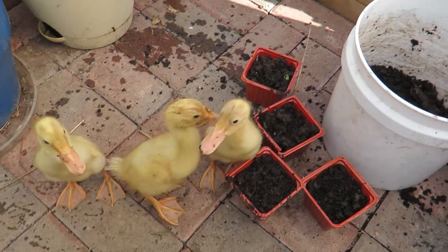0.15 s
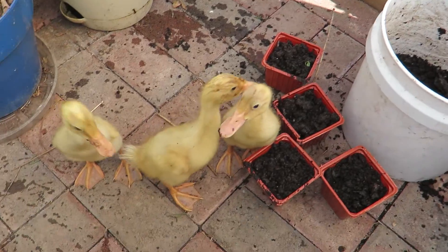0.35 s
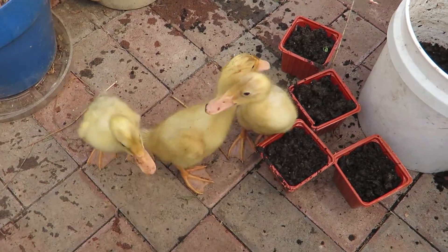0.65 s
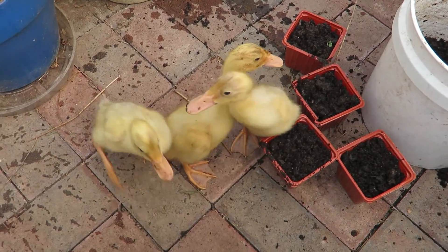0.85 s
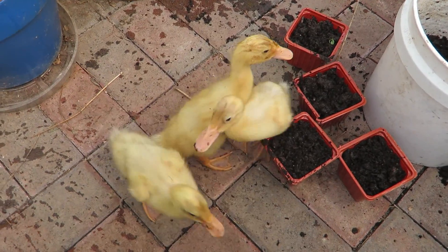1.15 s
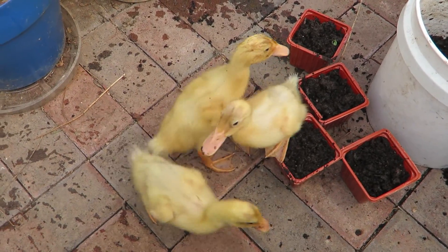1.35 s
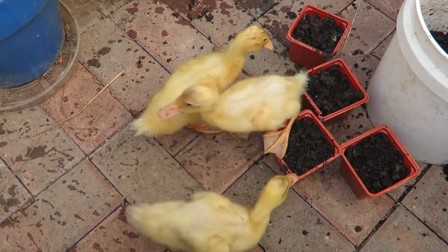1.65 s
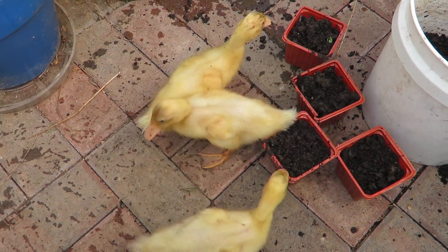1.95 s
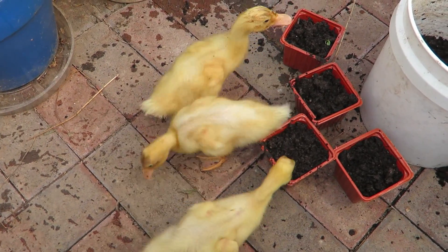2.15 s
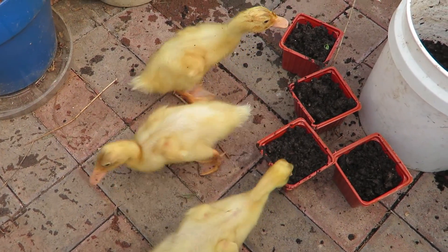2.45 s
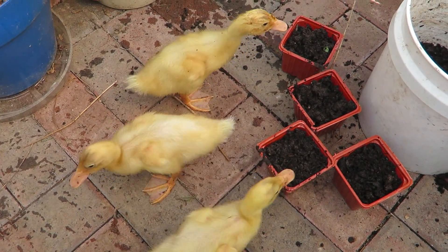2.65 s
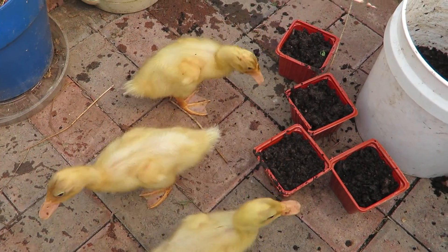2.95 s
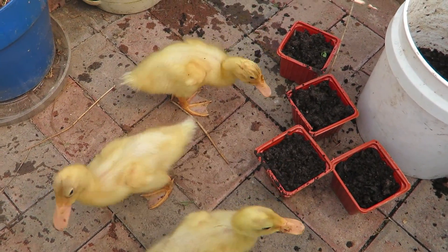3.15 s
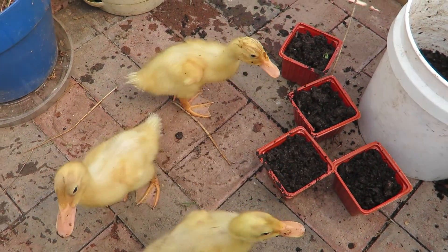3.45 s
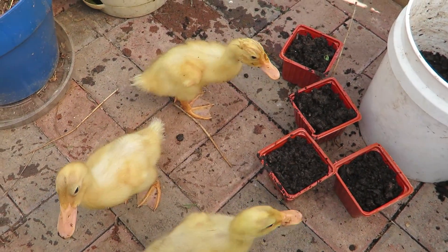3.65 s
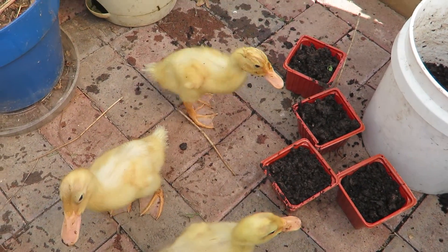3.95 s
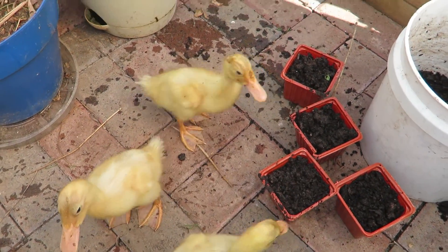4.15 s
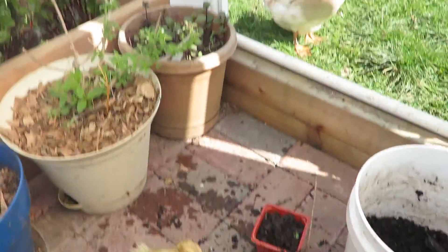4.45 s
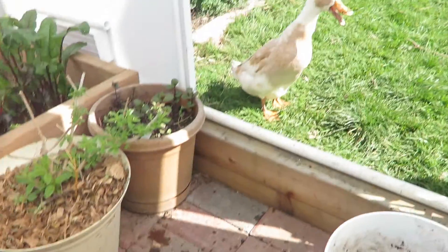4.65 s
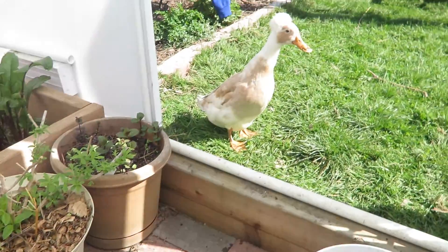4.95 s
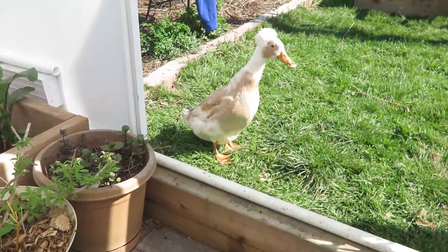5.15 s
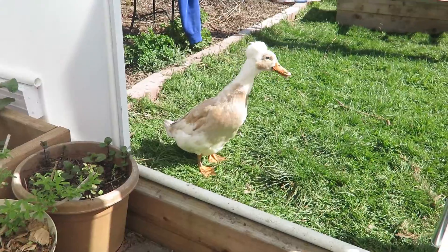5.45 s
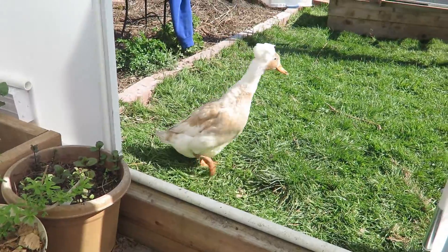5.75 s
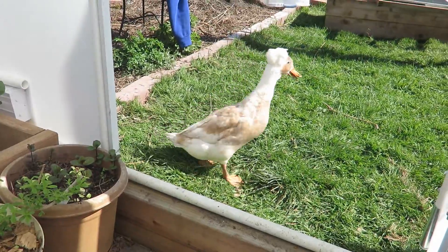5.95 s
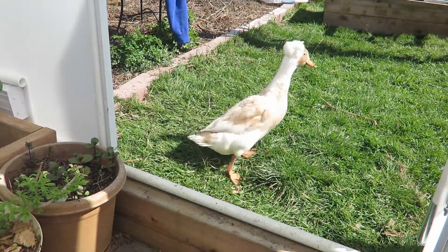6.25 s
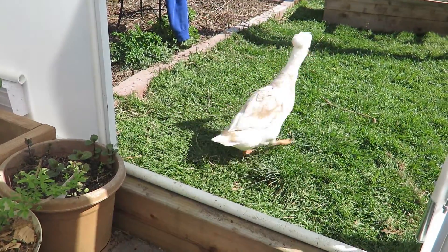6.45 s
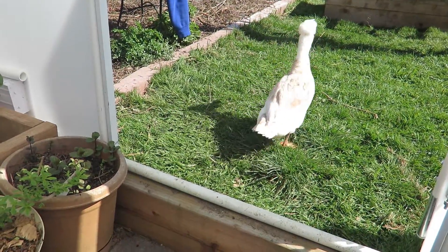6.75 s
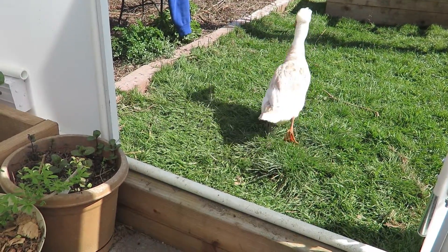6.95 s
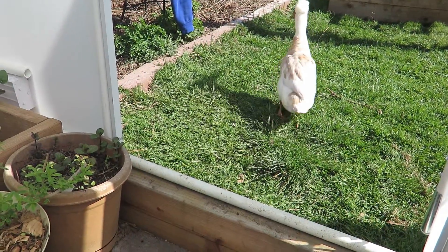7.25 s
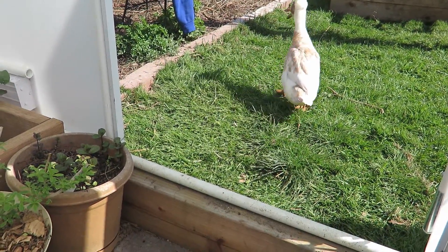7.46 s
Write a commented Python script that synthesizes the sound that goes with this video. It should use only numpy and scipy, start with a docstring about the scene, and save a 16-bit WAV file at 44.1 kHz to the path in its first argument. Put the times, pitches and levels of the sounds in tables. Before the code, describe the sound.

A nearby duck quacks loudly and steadily on a paved patio, with tiny duckling peeps, a plastic pot knock and a hoarse distant answer.

```python
"""A paved, walled patio: a near duck quacks roughly every three quarters of a second, a hoarse one answers from afar.
Both voices are harmonics of membrane pulses, shaped by throat, windpipe and bill and roughened by noise.
Ducklings peep in gliding whistles; feet and bills patter as short noise bursts among plastic pots.
A distant motor hums in wavering sines under coloured-noise hiss and rumble; echoes and a noise tail make the patio."""
import sys
import numpy as np
from scipy import signal
from scipy.fft import rfft, irfft, next_fast_len
from scipy.io import wavfile
from scipy.ndimage import uniform_filter1d

SR = 44100
rng = np.random.default_rng(int(sys.argv[2]) if len(sys.argv) > 2 else 0)


def digitize_waveform(pressure):
    """Quantize a signal to 16-bit integers and store it at the path in sys.argv[1].

    Rows of a 2-D input are taken as channels; values are limited to [-1, 1].
    """
    field = np.atleast_2d(pressure).T
    bounded = np.clip(field, -1, 1)
    quanta = np.round(bounded * 32767).astype(np.int16)
    wavfile.write(sys.argv[1], SR, quanta)


N = 335601

# spectrum of the outdoor hiss: freq_hz, density_db (per Hz, relative)
HISS_SPECTRUM = [(200, -3), (300, 2), (500, -1.5), (900, 1), (1500, -5), (2500, -8), (4000, -12),
                 (6300, -17.5), (8000, -23), (10000, -26), (12500, -30), (15000, -44.5)]
# width of hiss and rumble: freq_hz, side_minus_mid_db
AIR_WIDTH = [(60, -26.5), (100, -22.5), (170, -4), (280, 0.5), (460, -1.5), (770, -6.5), (1280, -8.5),
             (2140, -9.5), (3560, -9.5), (5940, -12)]
# spectrum of the low rumble: freq_hz, density_db (per Hz, relative)
RUMBLE_SPECTRUM = [(15, -41.5), (28, -21.5), (40, -8.5), (65, -10.5), (100, 5.5), (150, -5), (200, -12),
                   (300, -23), (600, -55.5)]
HISS_DB, RUMBLE_DB, RUMBLE_SWELL_DB = -61, -59, 1.5

# motor hum lines, each swelling and sinking: freq_hz, loudest_db, loudest_at_s, sink_db_per_s, most_sink_db
HUM_LINES = [(42, -54, 6.5, 2, 17), (78.3, -48.5, 4, 6, 11.5), (130, -60, 6.2, 6, 7.5),
             (158.3, -52, 7.0, 2.5, 15.5), (241, -67.5, 6.0, .5, 3)]

# reflections from paving, wall and pots: delay_s, level_db
REFLECTIONS = [(.0027, -18), (.0089, -9.5), (0.0148, -6), (0.0207, -20)]
# the patio tail in the middle; bass escapes to the sky, treble is soaked up: freq_hz, level_db
TAIL_MID = [(150, -13), (400, -4.5), (900, -4), (1500, -1), (3000, 3.5), (8000, -5), (14000, -9.5)]
# the patio tail at the sides: freq_hz, level_db
TAIL_SIDE = [(100, -11.5), (280, -15), (770, -25.5), (2100, -16.5), (6000, -8.5), (12000, -6)]
TAIL_T60_S = 0.19

# feet and bills against pots and paving: start_s, level_db, centre_hz, t60_s
TAP_EVENTS = [(1.019, -39.5, 1470, 0.258), (1.039, -51, 3525, 0.1), (1.155, -56, 5480, .03),
              (1.316, -19, 1060, 0.084), (1.324, -16.5, 2600, 0.0094), (1.324, -21, 1360, 0.2),
              (1.417, -32, 4230, 0.01), (1.431, -35, 4033, 0.013), (1.979, -60.5, 4840, .05),
              (2.255, -37, 900, 0.043), (2.31, -45.5, 1199, 0.041), (3.0, -53, 4510, 0.0277),
              (5.02, -50, 2975, 0.033)]

# peeps that flick up, slide to a held note that creeps up, then drop:
# start_s, flick_s, slide_s, hold_s, top_hz, held_hz, flick_db, held_db
HOOKED_PEEPS = [(1.511, 0.0506, 0.0327, 0.028, 4366, 2865, -54.5, -41.5),
                (4.404, 0.036, 0.0432, .035, 3910, 2320, -55.5, -38),
                (4.533, 0.011, 0.013, .028, 2280, 1987, -54, -43),
                (5.236, 0.048, 0.034, .04, 3720, 2330, -56, -41),
                (6.38, .024, .032, .036, 3950, 2650, -57, -38),
                (7.085, 0.024, 0.036, 0.041, 3750, 2594, -52.5, -38),
                (7.391, 0.025, 0.039, .05, 3615, 2660, -49, -35.5)]
HOOK_FROM_HZ, HOOK_TO_HZ, DROP_S = 1650, 1600, 0.017
CREEP_RATIO = 1.09  # pitch at the end of the hold over the held note
SLIDE_SAG = 0.35  # share of the slide's height left halfway down
MID_FLICK_DB = -1.5  # against the ends of the flick
MID_SLIDE_DB, HOLD_END_DB, DROP_DB = -1, -0.5, -15  # against the held note
# peeps that rise, hold and fall: start_s, length_s, from_hz, top_hz, to_hz, level_db
ARCHED_PEEPS = [(0.62, .088, 1860, 3756, 2896, -51), (2.146, .1, 1487, 3330, 2700, -54.5),
                (2.172, .033, 1710, 2306, 1547, -57), (4.165, 0.09, 2020, 2433, 1971, -48.5)]
# course of an arched peep: length_share, height_share (of the way to the top), level_db
ARCH_COURSE = [(0, 0, -6.5), (.13, .45, 3.5), (.3, .88, -2.5), (.5, 0.98, -0.5), (.7, .85, -3),
               (1, 0.21, -2.5)]
# second and third harmonic of a peep: level_db
PEEP_HARMONICS_DB = [-28.5, -45]

# far duck, one list a call: time_s, pitch_hz, effort_db
FAR_CALLS = [
    [(3.355, 172.5, -50.5), (3.375, 177, -34), (3.4, 177.3, -31), (3.44, 164, -66)],
    [(3.488, 158.7, -34), (3.52, 175.2, -28.5), (3.552, 181, -38.5), (3.58, 174, -61)],
    [(3.67, 150.3, -40.5), (3.69, 160.5, -26), (3.71, 168.5, -35.5), (3.722, 196, -22.5),
     (3.78, 204.2, -24.5), (3.84, 197.6, -22.5), (3.9, 187.2, -24)],
]
# bill brightness of each far call: start_db, end_db
FAR_BRIGHTNESS = [(-11, -23), (11.5, -14.5), (1, -4)]
# far duck's fixed resonances, windpipe then bill: centre_hz, width_hz, level_db
FAR_WINDPIPE_RESONANCES = [(290, 250, -34), (914.5, 100, -21), (1403, 80, -18), (2725, 230, -9.5)]
FAR_BILL_RESONANCES = [(3290, 460, -9.5), (4600, 610, -20.5)]
FAR_THROAT_WIDTH_HZ, FAR_CHEST_DB, FAR_ROUGH = 170, -29, 0.42
FAR_THROAT_HARMONIC = 10.1  # its throat resonance rides at this multiple of the pitch

# near duck, one row a quack: start_s, length_s, top_hz, glide_exponent, effort_db, bright_db, hoarse_factor,
# throat_hz (widest), then throat strength: burst_db, dip_share (of length), dip_db, late_db
NEAR_QUACKS = [(-.033, 0.22, 302, 1.0, -13.5, 0, 0.81, 1662, 2, 0.41, -2.5, -4.5),
               (0.692, .21, 290.8, 1.02, -14, -1.5, 0.94, 1700, 2.5, 0.79, -7, -1.5),
               (1.612, 0.21, 293.4, 1.02, -14.5, -1, 1.14, 1724, 3.5, 0.57, -0.5, 0.5),
               (2.39, 0.21, 298.2, 0.91, -14, 0, 0.88, 1720, 1.5, 0.62, -4, -3),
               (3.09, 0.21, 296.9, .93, -14, -0.5, 1.1, 1680, 2, .45, -3, -2.5),
               (3.869, 0.23, 289.1, 1.01, -14, 0, 0.74, 1704, 2, 0.64, -1, 0),
               (4.625, 0.22, 296.7, 1.02, -14.5, 2.5, 1.3, 1650, 2, 0.79, -0.5, -1),
               (5.352, .209, 291.8, .93, -13, 1.5, .6, 1514, 1, .45, 0, 2),
               (6.037, 0.22, 291.4, .92, -15, -.5, 0.966, 1580, 3.5, 0.34, -3.5, 0.5),
               (6.735, 0.22, 289.2, .85, -16.5, -2, 1.055, 1588, 4, 0.45, -1.5, 0.5),
               (7.445, 0.25, 290.4, 0.85, -13.5, -0.5, 1.03, 1534, -2.5, .3, 3.5, 2)]
# windpipe resonance under the second harmonic, one value a quack: low_db
NEAR_LOW_DB = [.5, -1.5, -2, 0, -.5, -3, -0.5, 1, 2, -2.5, 1]
# course of every quack: length_share, effort_db, opening (throat, 0-1), chest_db, bill_db, rough (0-1)
QUACK_COURSE = [(0, -14, 0.01, 2.5, -19.5, .13), (.04, -9.5, .15, -2.5, -8.5, .18),
                (.09, -3, 0.2, -7.5, -1.5, 0.3), (.17, 2, .55, 1, -1, .17), (.285, 0, .85, 0, 1, .05),
                (.49, -1, 0.6, -.5, 0, .06), (.66, .5, 1, -0.5, 1.5, 0.1), (.8, 0, 0.98, -4.5, 1, 0.11),
                (.91, -1.5, .75, 2.5, 0, 0.15), (1, -7, 0.3, 2, -0.5, .2)]
# pitch of every quack: length_share, top_pitch_share
PITCH_COURSE = [(0, .46), (.09, .64), (.15, .76), (.25, .885), (.35, .953), (.45, .977), (.65, .993),
                (.76, 1), (.86, .988), (1, .91)]
# near duck's fixed resonances, windpipe then bill: centre_hz, width_hz, level_db
NEAR_WINDPIPE_RESONANCES = [(250, 250, -18), (880, 330, -10), (585, 200, -14), (2080, 420, -5.5)]
NEAR_BILL_RESONANCES = [(2997, 390, -13), (5010, 2000, -14.5), (6005, 210, -14.5), (7380, 3200, -22.5),
                        (12100, 5000, -35.5)]
NEAR_THROAT_WIDTH_HZ, SHUT_THROAT_HZ = 356, 1382
BURST_AT, DIP_TAKES, LATE_AT = 0.26, 0.28, 0.66  # shares of length
BURST_LIFT_DB = 2  # throat strength against the burst, just ahead of the dip

# narrow bands where both voices are weak: centre_hz, width_hz, depth (0-1)
VOICE_NOTCHES = [(579, 32, 0.3), (1206, 96, 0.7)]
# treble change as the duck turns away, near 2, 3, 5, 8 and 12 kHz: slope_db_per_s
TURN_AWAY = [0, -.6, -1.4, -2.5, -5]
TURN_S = 3.35  # the turn starts here
PULSE_SOFTNESS = 19  # harmonic above which the pulse fades
STEADY_HZ = 990  # the lowest harmonics do not flutter
RASP_HZ = 2570  # the treble above here is smeared and shredded
RASP_PER_ROUGH = 1.5  # rougher moments shred the treble more
TOP_BILL_FACTOR = 0.9  # factor on bill brightness in the two highest bill resonances
CONTROL_STEP = 64  # samples between updates of the resonances

CUTOFF_HZ = 15500


def amp(db):
    """Decibels to gain."""
    return 10 ** (np.asarray(db) / 20)


def rms_one(x):
    """Scale to unit rms."""
    return x / np.sqrt(np.mean(x ** 2) + 1e-20)


def at_hz(points, hz):
    """Read a spectrum on a log-frequency axis."""
    point_hz, point_db = np.transpose(points)
    return np.interp(np.log(hz + 1), np.log(point_hz), point_db)


def colour(x, points):
    """Filter by a table of freq_hz, level_db."""
    size = next_fast_len(N)
    hz = np.arange(size // 2 + 1) * SR / size
    return irfft(rfft(x, size) * amp(at_hz(points, hz)), size)[..., :N]


def drift(rate_hz, size):
    """Random wavering: noise through a double one-pole low-pass, at unit rms."""
    r = np.exp(-2 * np.pi * rate_hz / SR)
    run_in = SR // 2
    noise = rng.standard_normal(size + run_in)
    return rms_one(signal.lfilter([1], [1, -2 * r, r * r], noise)[run_in:])


def lowpass(x, hz):
    """Second-order low-pass run both ways, so it adds no delay."""
    return signal.sosfiltfilt(signal.butter(2, hz, fs=SR, output="sos"), x)


def call(rows, fade_s):
    """Sample positions of one call, its fade and its columns; the fade-out takes four times the fade-in."""
    s, *columns = np.transpose(rows)
    at = np.arange(max(round(s[0] * SR), 0), min(round(s[-1] * SR), N))
    t = at / SR
    fade_in = np.clip((t - s[0]) / fade_s, 0, 1)
    fade_out = np.clip((s[-1] - t) / (4 * fade_s), 0, 1)
    return at, fade_in * fade_out, [np.interp(t, s, c) for c in columns]


def air():
    """Outdoor hiss and a swelling low rumble: coloured noise, as mid and side."""
    white = rng.standard_normal((2, N))
    hiss = colour(white, [(120, -40.0)] + HISS_SPECTRUM)
    hiss_reference = np.std(colour(white[0], [(120, -38)] + HISS_SPECTRUM))
    hiss_gain = amp(HISS_DB + 1.2 * drift(1.3, N))
    rumble = colour(white, RUMBLE_SPECTRUM)
    rumble_gain = amp(RUMBLE_DB + RUMBLE_SWELL_DB * drift(2.5, N))
    mid, side = hiss_gain * hiss / hiss_reference + rumble_gain * rumble / np.std(rumble)
    return np.array([mid, colour(side, AIR_WIDTH)])


def motor():
    """Distant hum: low sine lines whose pitch and strength waver."""
    t, out = np.arange(N) / SR, np.zeros(N)
    for hz, loudest_db, loudest_s, sink_db, most_sink_db in HUM_LINES:
        phase = 2 * np.pi * hz * np.cumsum(1 + 0.0087 * drift(1.5, N)) / SR
        level_db = loudest_db - np.minimum(sink_db * abs(t - loudest_s), most_sink_db)
        out += amp(level_db + 0.7 * drift(3.0, N)) * np.sqrt(2) * np.sin(phase)
    return out


def echoes(x):
    """The sound and its first reflections; small surfaces return little bass."""
    out = x.copy()
    thin = signal.lfilter(*signal.butter(1, 900, "high", fs=SR), x)
    for delay_s, db in REFLECTIONS:
        delay = round(delay_s * SR)
        out[delay:] += amp(db) * thin[:-delay]
    return out / np.sqrt(1 + sum(amp(db) ** 2 for _, db in REFLECTIONS))


def patio(x):
    """Dense scattering between walls and pots: decaying noise tails, one for mid and one for side."""
    t = np.arange(SR // 2) / SR
    build_up = np.clip(t / 0.012, 0, 1)
    tail = rng.standard_normal((2, len(t))) * amp(-60 * t / TAIL_T60_S) * build_up
    tail = tail / np.sqrt(np.sum(tail[0] ** 2))
    mid, side = signal.fftconvolve(x[None], tail, axes=1)[:, :N]
    return np.array([colour(mid, TAIL_MID), colour(side, TAIL_SIDE)])


def taps():
    """Each tap is a dying noise burst, broadly coloured round its centre, with a faint bright edge."""
    out, t = np.zeros(N), np.arange(SR // 5) / SR
    for start_s, db, hz, t60_s in TAP_EVENTS:
        burst = rng.standard_normal(len(t)) * amp(-60 * t / t60_s)
        band = signal.butter(2, [hz / 2, hz * 2], "band", fs=SR, output="sos")
        body = signal.sosfilt(band, burst)
        edge = amp(-25.5) * burst * amp(-60 * t / 0.018)
        start = round(start_s * SR)
        out[start:start + len(t)] += amp(db) * (body + edge)
    return out


def hook(start_s, flick_s, slide_s, hold_s, top_hz, held_hz, flick_db, held_db):
    """Pitch and level course of a hooked peep."""
    steps_s = [0, flick_s / 2, flick_s / 2, slide_s / 2, slide_s / 2, hold_s, DROP_S]
    mid_flick_hz = (HOOK_FROM_HZ + top_hz) / 2
    mid_slide_hz = held_hz + SLIDE_SAG * (top_hz - held_hz)
    hz = [HOOK_FROM_HZ, mid_flick_hz, top_hz, mid_slide_hz, held_hz, CREEP_RATIO * held_hz, HOOK_TO_HZ]
    db = [flick_db, flick_db + MID_FLICK_DB, flick_db,
          held_db + MID_SLIDE_DB, held_db, held_db + HOLD_END_DB, held_db + DROP_DB]
    return np.transpose([start_s + np.cumsum(steps_s), hz, db])


def arch(start_s, length_s, from_hz, top_hz, to_hz, level_db):
    """Pitch and level course of an arched peep."""
    share, height, db = np.transpose(ARCH_COURSE)
    foot_hz = np.where(share < 0.5, from_hz, to_hz)
    pitch_hz = foot_hz + height * (top_hz - foot_hz)
    return np.transpose([start_s + share * length_s, pitch_hz, level_db + db])


def ducklings():
    """Gliding whistles, breathy when soft, with two faint overtones when loud."""
    out = np.zeros(N)
    peeps = [hook(*row) for row in HOOKED_PEEPS] + [arch(*row) for row in ARCHED_PEEPS]
    for rows in peeps:
        at, fade, (pitch_hz, level_db) = call(rows, fade_s=0.00058)
        phase = 2 * np.pi * np.cumsum(uniform_filter1d(pitch_hz, size=300)) / SR
        loud = np.clip(amp(level_db + 40.0), 0, 1)
        overtones = sum(amp(db) * np.sin(order * phase)
                        for order, db in enumerate(PEEP_HARMONICS_DB, start=2))
        tone = np.sin(phase) + loud * overtones
        breath = 0.8 * (1 - loud) ** 2
        tone = tone * (np.sqrt(1 - breath ** 2) + breath * drift(250, len(at)))
        out[at] += fade * amp(level_db + 4.2 * drift(60, len(at))) * np.sqrt(2) * tone
    return out


def answer(rows, brightness_db):
    """Course of one far call, with the same controls as a quack."""
    bill_db = np.linspace(*brightness_db, len(rows))
    return [(s, hz, db, FAR_THROAT_HARMONIC * hz, 0, FAR_CHEST_DB, 0, bright_db, FAR_ROUGH)
            for (s, hz, db), bright_db in zip(rows, bill_db)]


def quack(start_s, length_s, top_hz, glide, effort_db, bright_db, hoarse, throat_hz,
          burst_db, dip_share, dip_db, late_db, low_db):
    """Course of one near quack: the shared course stretched and scaled."""
    share = np.linspace(0, 1, num=41)
    at, *course = np.transpose(QUACK_COURSE)
    swell_db, opening, chest_db, bill_db, rough = [np.interp(share, at, c) for c in course]
    pitch_hz = top_hz * np.interp(share ** glide, *np.transpose(PITCH_COURSE))
    throat = SHUT_THROAT_HZ + opening * (throat_hz - SHUT_THROAT_HZ)
    # sorted times keep the levels in order: where two points cross, they trade times
    strength_at = np.sort([0, BURST_AT, dip_share - DIP_TAKES, dip_share, LATE_AT, 1])
    strength_db = [0, burst_db, burst_db + BURST_LIFT_DB, dip_db, late_db, 0]
    throat_db = np.interp(share, strength_at, strength_db)
    return np.transpose([start_s + share * length_s, pitch_hz, effort_db + swell_db, throat, throat_db,
                         chest_db, low_db + 0 * share, bill_db + bright_db, hoarse * rough])


def resonance(hz, centre_hz, width_hz):
    """Complex response of one resonance, 1 on top."""
    return 1j * hz * width_hz / (centre_hz ** 2 - hz ** 2 + 1j * hz * width_hz)


def smear(x, share):
    """Three short all-pass loops spread each pulse over a few milliseconds without colouring it."""
    share = np.clip(share, 0, 0.8)
    for lag in (23, 41, 67):  # samples
        loop = np.r_[1, np.zeros(lag - 1), share]
        x = signal.lfilter(loop[::-1], loop, x)
    return x


def duck(calls, throat_width_hz, windpipe, bill, jitter, shimmer_hz, rasp):
    """A pulse per membrane cycle: harmonics weighted and phased by throat, windpipe and bill."""
    out, order = np.zeros(N), np.arange(1, 56)[:, None]
    for rows in calls:
        at, fade, controls = call(rows, fade_s=0.0014)
        pitch_hz, effort_db, throat_hz, throat_db, chest_db, low_db, bill_db, rough = controls
        rough = np.clip(rough, 0, 1)
        shred = np.clip(rasp + RASP_PER_ROUGH * rough, 0, 0.95)

        # uneven cycles blur the upper harmonics first
        unevenness = jitter * rough * drift(130, len(at))
        phase = 2 * np.pi * (np.cumsum(pitch_hz) / SR - 0.1 + unevenness)

        # a nearly shut bill dulls the treble and lets the windpipe sound through
        nasal_db, *away_db = np.outer(TURN_AWAY, np.maximum(at / SR - TURN_S, 0))
        top_db = bill_db * TOP_BILL_FACTOR
        windpipe_db = [chest_db, -0.5 * bill_db, low_db, nasal_db]
        brightness_db = [bill_db + away_db[0], bill_db + away_db[1], bill_db + away_db[1],
                         top_db + away_db[2], top_db + away_db[3]]

        hz = order * pitch_hz[::CONTROL_STEP]
        throat = resonance(hz, throat_hz[::CONTROL_STEP], throat_width_hz) ** 2
        fixed = 0
        for (centre_hz, width_hz, db), gain_db in zip(windpipe + bill, windpipe_db + brightness_db):
            fixed = fixed + amp(db + gain_db[::CONTROL_STEP]) * resonance(hz, centre_hz, width_hz) ** 2

        # the pulse fills a fixed share of its cycle, so slow pulses are dull
        source = 1 / (1 + 1j * order / PULSE_SOFTNESS) ** 4
        for centre_hz, width_hz, depth in VOICE_NOTCHES:
            source = source * (1 - depth * resonance(hz, centre_hz, width_hz))

        # levelled ahead of the throat strength, which therefore also changes the loudness
        loudness = np.sqrt(np.sum(abs(source * (throat + fixed)) ** 2, axis=0) / 2)
        weights = source * (amp(throat_db[::CONTROL_STEP]) * throat + fixed) / loudness
        held = np.repeat(weights, CONTROL_STEP, axis=1)[:, :len(at)]
        smooth_real = uniform_filter1d(held.real, size=CONTROL_STEP, axis=1)
        smooth_imag = uniform_filter1d(held.imag, size=CONTROL_STEP, axis=1)
        smooth = smooth_real + 1j * smooth_imag
        voice = np.sum(smooth * np.exp(1j * order * phase), axis=0).real

        # turbulent air makes the strength of the pulses flutter, and shreds their treble
        steady = lowpass(voice, STEADY_HZ)
        flutter = np.sqrt(1 - rough ** 2) + rough * drift(shimmer_hz, len(at))
        voice = steady + (voice - steady) * flutter
        body = lowpass(voice, RASP_HZ)
        shredding = np.sqrt(1 - shred ** 2) + shred * drift(450, len(at))
        treble = smear(voice - body, share=0.56) * shredding
        out[at] += fade * amp(effort_db) * (body + treble)
    return out


def far_duck():
    """The hoarse answering voice: a narrow throat resonance that follows the pitch."""
    calls = [answer(rows, brightness) for rows, brightness in zip(FAR_CALLS, FAR_BRIGHTNESS)]
    return duck(calls, FAR_THROAT_WIDTH_HZ, FAR_WINDPIPE_RESONANCES, FAR_BILL_RESONANCES,
                jitter=0.042, shimmer_hz=108.3, rasp=0.05)


def near_duck():
    """The main quacking voice: a broad throat resonance that opens and closes with each quack."""
    calls = [quack(*row, low_db) for row, low_db in zip(NEAR_QUACKS, NEAR_LOW_DB)]
    return duck(calls, NEAR_THROAT_WIDTH_HZ, NEAR_WINDPIPE_RESONANCES, NEAR_BILL_RESONANCES,
                jitter=0.14, shimmer_hz=150, rasp=0.3)


def scene():
    """Mix all sources in mid and side, then turn them into left and right."""
    peeps, knocks, far, near = ducklings(), taps(), far_duck(), near_duck()
    direct = echoes(near + peeps + amp(-3.0) * far) + knocks + motor()
    patio_send = amp(-4.5) * near + amp(-1.5) * far + amp(-4.5) * peeps + amp(-9.5) * knocks
    mid, side = air() + patio(patio_send)
    return np.array([direct + mid + side, direct + mid - side])


def record(dry):
    """A steep low-pass cuts the very top."""
    return signal.sosfilt(signal.cheby2(12, 60, CUTOFF_HZ, fs=SR, output="sos"), dry)


dry = scene()
out = record(dry)
digitize_waveform(out)
```